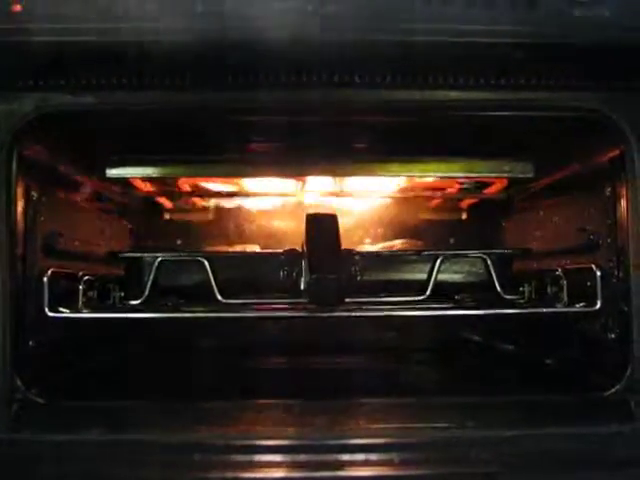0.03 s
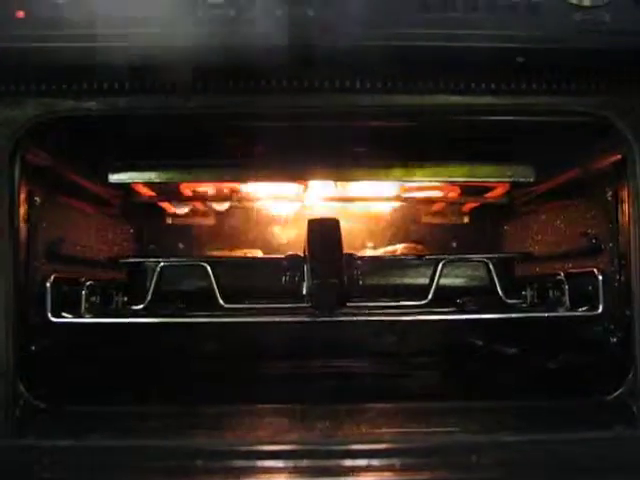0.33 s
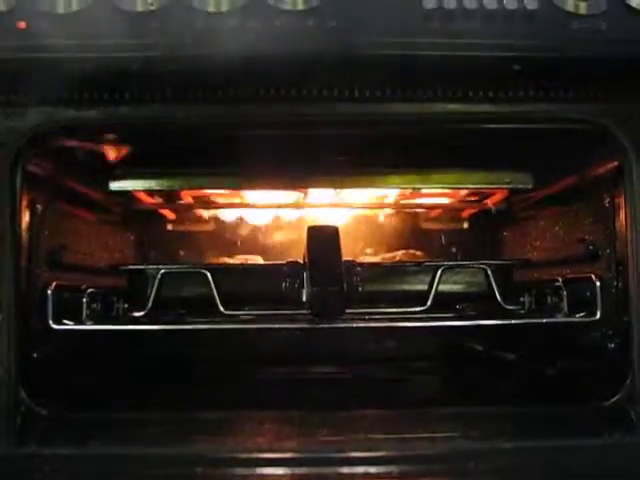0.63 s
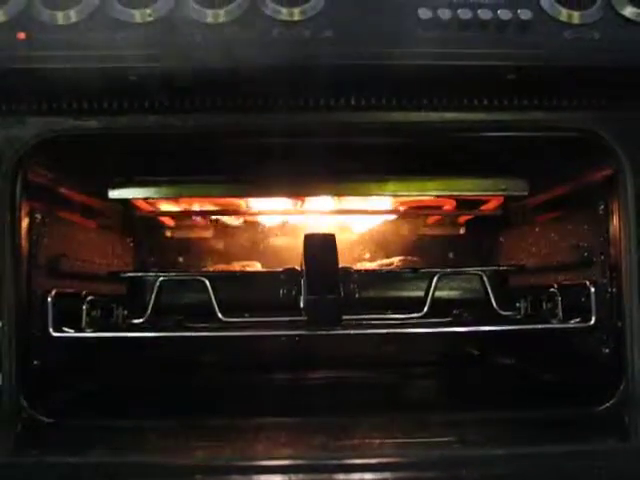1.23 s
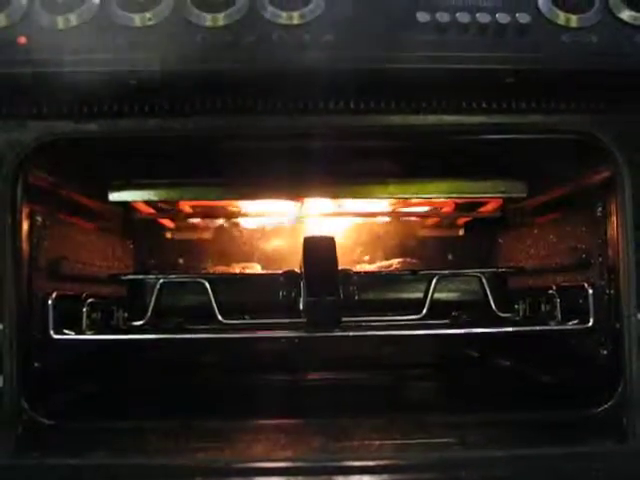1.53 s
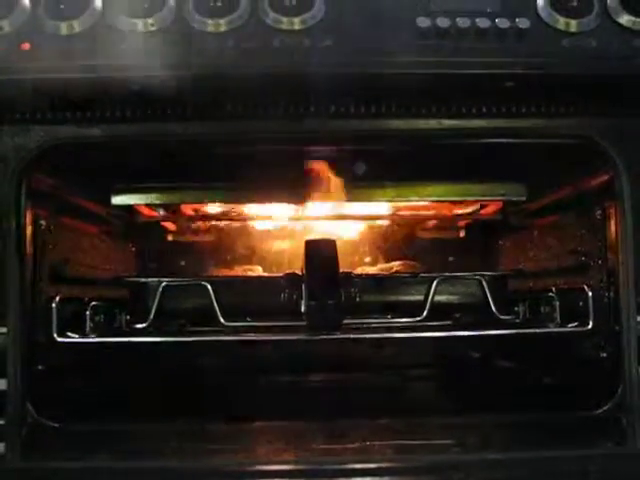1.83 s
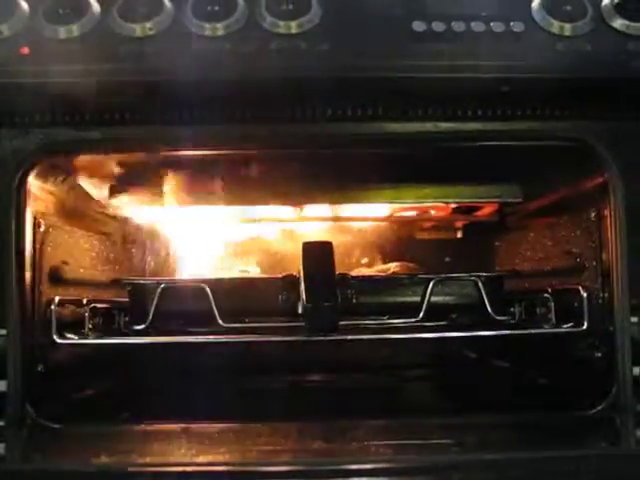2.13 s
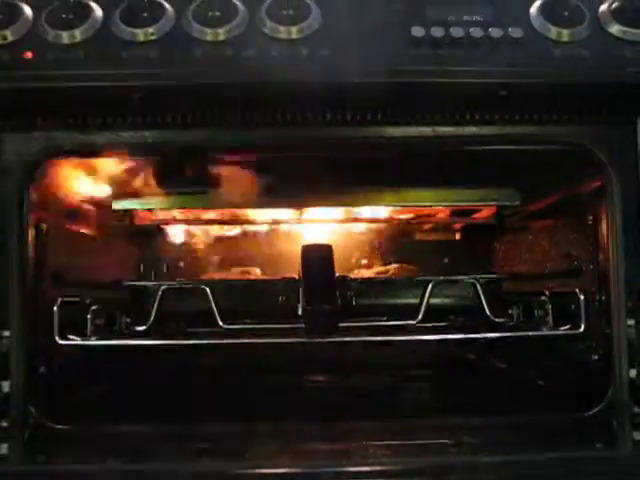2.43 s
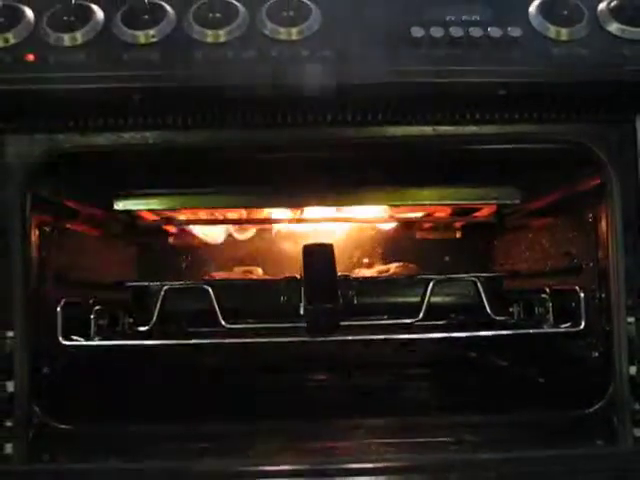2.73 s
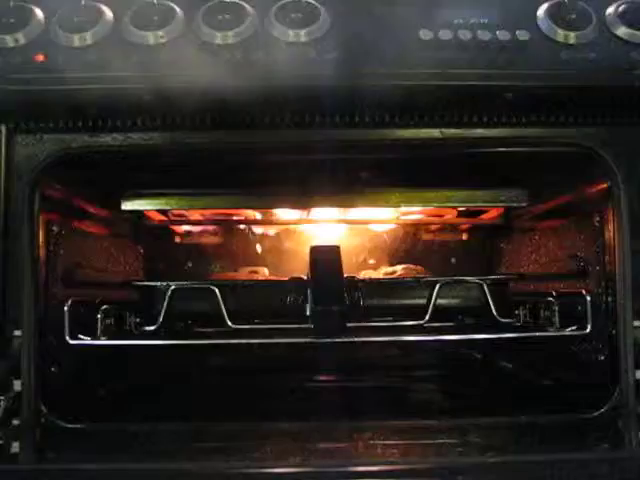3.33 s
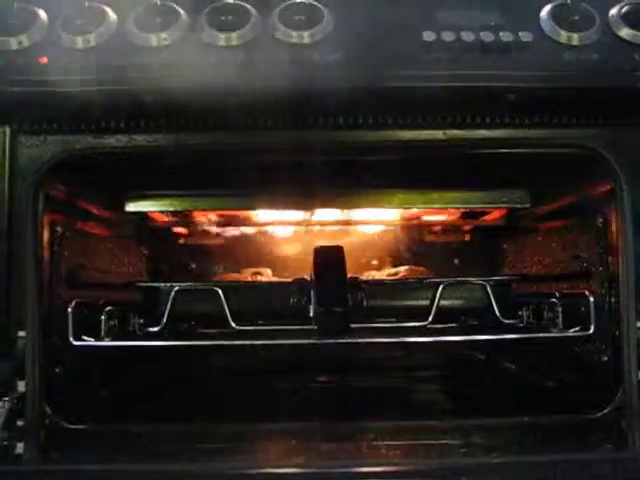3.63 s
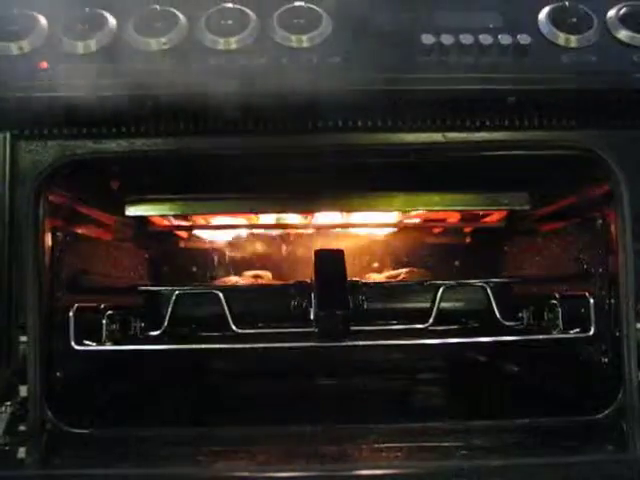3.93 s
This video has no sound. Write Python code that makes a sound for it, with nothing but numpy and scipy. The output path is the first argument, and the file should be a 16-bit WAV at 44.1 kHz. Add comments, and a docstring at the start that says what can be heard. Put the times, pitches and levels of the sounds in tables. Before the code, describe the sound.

Fat sizzles under an oven grill with a steady hiss and occasional sharp pops.

```python
"""A kitchen, with a stereo pair of microphones at the open oven door: food sizzles under a glowing grill.
Tiny bubbles of fat burst by the thousand over a hiss of steam and set the steel cavity ringing;
larger drops spit, pop and sputter. A low rumble and mains hum lie underneath.
The recorder adds a faint hiss, and its limiter ducks after the loudest pops."""
import sys
import numpy as np
from scipy import signal
from scipy.fft import rfft, irfft, next_fast_len
from scipy.io import wavfile
from scipy.ndimage import uniform_filter1d

SR = 44100
rng = np.random.default_rng(int(sys.argv[2]) if len(sys.argv) > 2 else 0)


def wav_record(signal):
    """Record a signal, one row per channel, as 16-bit PCM in the file named by sys.argv[1]."""
    frames = np.transpose(np.atleast_2d(signal))
    bounded = np.clip(frames, -1, 1)
    # unit amplitude maps onto the largest positive 16-bit level
    quanta = np.round(bounded * 32767).astype(np.int16)
    wavfile.write(sys.argv[1], SR, quanta)


N = 176400
T = np.arange(N) / SR
FFT_SIZE = next_fast_len(N + SR // 4)
HZ = np.maximum(np.arange(FFT_SIZE // 2 + 1) * SR / FFT_SIZE, 1)


def from_db(db):
    """Decibels to gain."""
    return 10 ** (np.asarray(db) / 20)


def unit_rms(x):
    """Scale to an RMS of 1."""
    return x / np.sqrt(np.mean(x ** 2) + 1e-20)


def gain_curve(points):
    """A (frequency [Hz], gain [dB]) table as a gain for every frequency."""
    hz, db = np.transpose(points)
    return from_db(np.interp(np.log(HZ), np.log(hz), db))


def colour(x, points):
    """Minimum-phase filter that follows a (frequency [Hz], gain [dB]) table."""
    cepstrum = irfft(np.log(gain_curve(points)), FFT_SIZE)
    cepstrum[1:FFT_SIZE // 2] *= 2
    cepstrum[FFT_SIZE // 2 + 1:] = 0
    return irfft(rfft(x, FFT_SIZE) * np.exp(rfft(cepstrum)), FFT_SIZE)[..., :N]


def noise(points):
    """Coloured (mid, side) noise with an RMS of 1."""
    return unit_rms(colour(rng.standard_normal((2, N)), points))


def drift(rate_hz):
    """Smooth random wander with an RMS near 1."""
    step, settle = 40, 2000
    pole = np.exp(-2 * np.pi * rate_hz * step / SR)
    white = rng.standard_normal(N // step + settle + 2)
    slow = signal.lfilter([1], [1, -2 * pole, pole * pole], white)[settle:]
    return np.interp(np.arange(N) / step, np.arange(len(slow)), unit_rms(slow))


def flutter(rate_hz):
    """Random wander with the slow swells taken out."""
    quick = drift(rate_hz)
    return unit_rms(quick - uniform_filter1d(quick, size=int(2 * SR / rate_hz)))


def swell(points, flutter_db, flutter_hz):
    """Gain that flutters around a (time [s], level [dB]) table."""
    return from_db(np.interp(T, *np.transpose(points)) + flutter_db * flutter(flutter_hz))


def burst(start, t60, hold=0):
    """Envelope that starts at once, holds and dies away; times in seconds."""
    envelope = np.zeros(N)
    span = slice(*np.searchsorted(T, [start, start + hold + 2 * t60]))
    envelope[span] = from_db(-60 * np.maximum(T[span] - start - hold, 0) / t60)
    return envelope


def ring(x, hz, t60):
    """A resonance: a unit click rings with a height of about 1."""
    radius, angle = from_db(-60 / (t60 * SR)), 2 * np.pi * hz / SR
    return signal.lfilter([.5, 0, -.5], [1, -2 * radius * np.cos(angle), radius ** 2], x + 1e-18)


def clicks(per_s, spread_db):
    """Randomly timed clicks, many small and few large."""
    sizes = from_db(spread_db * np.minimum(rng.exponential(1, N), 4)) * rng.choice([-1, 1], N)
    return sizes * (rng.random(N) < per_s / SR)


def oven_walls(x, t60=0.023, reflections_db=-1):
    """One spot in the oven as (mid, side): the direct sound and quick reflections off the walls."""
    t = T[:SR // 25]
    response = rng.standard_normal((2, len(t))) * from_db(-60 * t / t60)
    response /= np.linalg.norm(response, axis=1, keepdims=True)
    response[0] *= from_db(reflections_db)
    response[0, 0] += 1   # direct sound, mid only
    response[0] /= np.linalg.norm(response[0])
    return signal.oaconvolve(x[None], response, axes=1)[:, :N]


def bubbles(per_s, spread_db, cycles, span_hz, spots):
    """Bubbles burst at many spots, each with its own pitch, fading 60 dB in `cycles` periods."""
    bursts = clicks(per_s, spread_db)
    spot = rng.integers(0, spots, N)
    out = 0
    for k, hz in enumerate(np.geomspace(*span_hz, spots)):
        pings = ring(bursts * (spot == k), hz, cycles / hz)
        out += oven_walls(pings) * hz
    return unit_rms(out)


# Low rumble of the kitchen around the microphones: (frequency [Hz], gain [dB])
ROOM_RUMBLE = [(20, -2.5), (40, -22), (62, 2.5), (82, -11.5), (130, 5), (165, -3), (240, -0.5), (420, -6.5),
               (800, -5.5), (3000, -42.5)]
# The recorder's smooth hiss at the very top: (frequency [Hz], gain [dB])
RECORDER_HISS = [(4000, -46), (9000, 4), (12000, -1), (14500, 3), (16000, -4)]
# Mains hum, centred: (frequency [Hz], level [dB])
MAINS_HUM = [(100, -54), (200, -55)]

def background(rumble_db=-43, hiss_db=-47.5):
    """Low room rumble and mains hum, with the recorder's faint high hiss."""
    out = from_db(rumble_db) * noise(ROOM_RUMBLE) + from_db(hiss_db) * noise(RECORDER_HISS)
    for hz, db in MAINS_HUM:
        out[0] += from_db(db) * np.sqrt(2) * np.sin(2 * np.pi * (hz * T + rng.random()))
    return out


# Cavity and pan, heard through the open door: (frequency [Hz], relative level [dB], t60 [s])
STEEL_MODES = [(571, -16.5, 0.27), (706, -19.5, 0.17), (876, -10, 0.075), (1144, -12.5, 0.27),
               (1607, -7, 0.14), (1903, -5.5, 0.03), (2000, -5.5, 0.061), (2466, -1.5, 0.093),
               (2686, 0.5, 0.042), (3007, -1.5, 0.18), (3576, 3, 0.013)]

def oven_ring(frying, ring_db=-22.5, waver_db=2.0):
    """The cavity and pan ring along with the frying, each mode swelling by itself."""
    modes = 0
    for hz, db, t60 in STEEL_MODES:
        drive = frying * from_db(waver_db * drift(rate_hz=3.8))
        modes += from_db(db) * unit_rms(ring(drive, hz, t60))
    return from_db(ring_db) * np.std(frying) * modes


# Fat bubbling down in the pan: (time [s], level [dB])
POOL_LEVEL = [(0, -34), (.3, -34.5), (.55, -34), (.78, -37), (1.15, -35.5), (1.25, -34), (1.47, -39.5),
              (1.58, -31), (1.69, -32), (1.735, -36), (1.78, -31), (1.95, -36), (2.03, -34), (2.13, -32),
              (2.3, -37), (2.48, -34.5), (2.8, -37), (2.92, -35), (3.16, -34.5), (3.2, -32), (3.33, -35),
              (3.45, -37), (3.67, -36), (4, -38)]

def bubbling(band_hz=(1700, 3900)):
    """Loose, longer-ringing bubbles in the pooled fat."""
    grains = bubbles(per_s=1500, spread_db=2.5, cycles=19, span_hz=(2007, 3290), spots=12)
    band = signal.butter(2, band_hz, "band", fs=SR, output="sos")
    return unit_rms(signal.sosfilt(band, grains)) * swell(POOL_LEVEL, flutter_db=1.0, flutter_hz=20)


# The crackle swells as the fat flares: (time [s], level [dB])
FLARE_LEVEL = [(0, -30.5), (.4, -36.5), (.58, -32.5), (.74, -36), (.88, -32), (1.05, -35.5), (1.5, -35),
               (1.64, -32.5), (1.74, -32), (1.88, -32.5), (1.96, -33.5), (2.1, -30.5), (2.25, -31.5),
               (2.44, -31), (2.5, -35.5), (2.95, -37), (3.2, -34), (3.5, -36.5), (3.66, -36), (3.75, -32.5),
               (3.85, -36), (4, -35)]
# Tone of the crackle at the door: (frequency [Hz], gain [dB])
CRACKLE_TONE = [(150, -17), (300, -1.5), (450, 1), (600, 4.5), (1000, 1.5), (1450, 5), (1900, 3),
                (2700, -3.5), (3500, -5.5), (6000, -5), (16000, -28)]

def crackle(bursts_db=-6.5, rush_db=-7):
    """Larger, lower bubbles and the rush of burning fat."""
    grains = bubbles(per_s=2000, spread_db=3, cycles=10, span_hz=(910, 4400), spots=14)
    bursts = from_db(bursts_db) * unit_rms(colour(grains, CRACKLE_TONE))
    rush = from_db(rush_db) * noise(CRACKLE_TONE)
    return (bursts + rush) * swell(FLARE_LEVEL, flutter_db=0.77, flutter_hz=17.6)


# Wet sputters inside the oven: (time [s], length [s], level [dB], pitch [Hz], t60 [s])
STEAM_POCKETS = [(0.203, 0.028, -31, 1750, 0.0074), (0.238, 0.015, -22, 2900, 0.0031),
                 (0.816, 0.037, -26.5, 2260, 0.0036), (0.818, 0.024, -26.5, 1070, 0.0092),
                 (1.707, 0.015, -30, 1900, 0.0044), (2.115, 0.025, -33, 2800, .004),
                 (2.225, 0.032, -30.5, 2760, .0025), (2.337, 0.025, -29, 1840, 0.0076),
                 (2.369, 0.009, -23, 2400, .002), (2.379, 0.021, -29.5, 2000, 0.0047),
                 (2.538, .015, -25.5, 3000, 0.0057), (2.669, .018, -28, 3080, .003),
                 (2.808, 0.005, -27, 2000, .004), (3.008, 0.031, -35, 1750, 0.007),
                 (3.147, 0.02, -34.5, 1940, 0.006), (3.321, .028, -32.5, 2600, .005)]

def sputters(edge_s=0.0016):
    """Steam forces through wet fat: a brief run of clicks into one pocket resonance."""
    run = oven_walls(clicks(per_s=1800, spread_db=2.5))
    out = 0
    for start, length, db, hz, t60 in STEAM_POCKETS:
        inside_s = np.minimum(T - start, start + length - T)
        gate = np.clip(inside_s / edge_s + .5, 0, 1)
        gate_rms = np.sqrt(np.mean(gate ** 2))
        out += from_db(db) * gate_rms * unit_rms(gate * ring(run, hz, t60))
    return out


# The oven's dull knock under a pop: (frequency [Hz], gain [dB])
KNOCK_TONE = [(60, -9), (200, -5), (600, 0.5), (1000, 4.5), (1800, 7.5), (3300, 5), (4500, -5),
              (16000, -55)]
# Large drops, heard from the door:
# (time [s], level [dB], pitch [Hz], relative knock [dB], relative ping [dB], spray resonance t60 [s])
LARGE_DROPS = [(0.24, -8.5, 5640, -8, -2, 0.0015), (0.946, -21.5, 4460, -9, -10, .001),
               (1.2235, -10.5, 7300, -15, -10, 0.0012), (1.708, -17, 4900, -13, -10, .0008),
               (1.9058, -7, 5270, -10, -2, .0017), (3.4595, -18, 5540, -25, -7, .0012)]

def pops(spray_pitch_ratio=1.1):
    """A drop explodes: a band of spray, a ringing ping just below it and a dull knock in the oven."""
    out = np.zeros((2, N))
    white = rng.standard_normal((2, N))
    knock = noise(KNOCK_TONE)
    for start, db, hz, knock_db, ping_db, spray_t60 in LARGE_DROPS:
        blast = from_db(db) * burst(start, t60=0.026, hold=0.001)
        spray_hz = spray_pitch_ratio * hz
        spray = unit_rms(ring(ring(white, spray_hz, spray_t60), spray_hz, spray_t60))
        out += blast * (spray + from_db(knock_db) * knock)
        ping = burst(start, t60=0.057) * np.sin(2 * np.pi * hz * (T - start))
        out[0] += from_db(db + ping_db) * ping
    return out


# Small drops, sharp at the microphones: (time [s], ping level [dB], pitch [Hz], spray level [dB])
SMALL_DROPS = [(0.135, -7, 7110, -15), (0.1968, 2, 7500, -17), (0.2895, -6.5, 5200, -29),
               (0.398, -3, 8000, -15), (0.4265, -15, 6830, -13), (0.6768, -6, 7060, -20),
               (0.722, -17, 7350, -29), (0.9163, -11, 7530, -20), (0.9726, -4, 6900, -12.5),
               (1.0292, -6, 7750, -26), (1.1082, -7, 8170, -19), (1.3948, -5, 7300, -18),
               (1.4716, -21, 7820, -28), (1.7085, -12, 5770, -20), (1.7474, -10, 7080, -18),
               (1.794, -10, 7240, -32), (2.331, -14, 7520, -20), (2.383, -7, 7500, -19),
               (2.4573, -6, 8150, -20), (2.5327, -8, 7600, -21), (2.809, -6, 7810, -17),
               (2.828, -8, 7540, -14), (2.9134, -10, 7100, -17), (3.1609, -6, 7900, -29),
               (3.292, -9, 7620, -20), (3.363, -11, 7700, -24), (3.4631, -10, 6800, -30),
               (3.541, -6, 7600, -24), (3.625, -9, 7570, -18), (3.797, -7, 7640, -26)]

def spits(ping_t60=0.0034, spray_t60=0.029, top_hz=10000):
    """Each spit of fat is a very short ping and a puff of spray with the tone of the sizzle."""
    pings, puffs = np.zeros(N), np.zeros(N)
    for start, db, hz, spray_db in SMALL_DROPS:
        pings += from_db(db) * burst(start, ping_t60) * np.sin(2 * np.pi * hz * (T - start))
        puffs += from_db(spray_db) * burst(start, spray_t60)
    out = puffs * noise(SIZZLE_TONE)
    soften = signal.butter(4, top_hz, fs=SR, output="sos")   # wet fat softens the snap
    out[0] += signal.sosfilt(soften, pings)
    return out


# Vigour of the sizzle under the grill: (time [s], level [dB])
SIZZLE_LEVEL = [(0, -17.5), (.17, -21), (.28, -21.5), (.37, -20.5), (.55, -20.5), (.78, -21.5), (.9, -21),
                (1.15, -23), (1.4, -21), (1.5, -23), (1.6, -20), (1.67, -21.5), (1.7, -19.5), (1.73, -22.5),
                (1.88, -22), (1.94, -21.5), (2.12, -18.7), (2.22, -21), (2.37, -21), (2.42, -23.5),
                (2.56, -21.5), (2.64, -22.5), (2.77, -20), (2.86, -22.5), (3.02, -23), (3.26, -20.5),
                (3.41, -23.5), (3.53, -21), (3.63, -22.5), (3.73, -20), (3.9, -22.5), (4, -21.5)]
# Its bright tone at close range: (frequency [Hz], gain [dB])
SIZZLE_TONE = [(900, -37), (1700, -21), (2600, -14), (3300, -15), (3650, -13.5), (4100, -13), (4700, -11),
               (5300, -6.5), (6400, -4.5), (7400, 0.5), (8100, -2.5), (8800, -6), (9500, -6.5),
               (10500, -11.5), (12200, -18), (14800, -20), (16000, -35)]

def sizzle(fizz_db=-1.32, steam_db=-3.5, clump_db=0.95):
    """Fine bubbles of fat burst in quick clumps over a smooth hiss of steam."""
    per_s = 4800 * from_db(clump_db * flutter(rate_hz=65))
    grains = bubbles(per_s, spread_db=4, cycles=6.8, span_hz=(2860, 9700), spots=28)
    fizz = from_db(fizz_db) * unit_rms(colour(grains, SIZZLE_TONE))
    steam = from_db(steam_db) * noise(SIZZLE_TONE)
    return (fizz + steam) * swell(SIZZLE_LEVEL, flutter_db=0.77, flutter_hz=34)


# Stereo width at the door: (frequency [Hz], side gain [dB])
PAIR_WIDTH = [(100, -41), (350, -19.5), (1450, -16.5), (1950, -24), (2250, -14), (3000, -7), (3900, -4.5),
              (4500, 2), (5100, -6.5), (6200, -8), (7300, -7.5), (9500, -3.5), (13000, -1.5)]
# Balance of the microphones: (frequency [Hz], left minus right [dB])
PAIR_BALANCE = [(100, 0.3), (700, -0.5), (2000, -0.1), (2300, -0.5), (2550, -5), (3500, -3.5), (4000, 2),
                (4550, 2.5), (5100, 2.5), (5700, -4.5), (6300, 0.5), (8800, -1.6), (13000, -0.2)]
# Phase between the microphones: (frequency [Hz], lead of the left [rad])
PAIR_PHASE = [(2900, -0.0091), (3600, 0.96), (4300, 0.37), (4850, -0.007), (6300, 1.27), (8000, -0.39),
              (9700, 0.97), (12000, 0.17)]

def microphones(x):
    """Mid and side to left and right: narrow in the bass, wide and uneven in the treble."""
    mid, side = rfft(x, FFT_SIZE)
    side = side * gain_curve(PAIR_WIDTH)
    lead = np.interp(HZ, *np.transpose(PAIR_PHASE))
    lean = np.sqrt(gain_curve(PAIR_BALANCE)) * np.exp(.5j * lead)
    left, right = (mid + side) * lean, (mid - side) / lean
    return irfft(np.array([left, right]), FFT_SIZE)[:, :N]


def scene():
    """From the oven door: steady frying in the ringing cavity, single drops and a quiet background."""
    frying = sizzle() + crackle() + bubbling()
    return microphones(frying + oven_ring(frying) + spits() + pops() + sputters() + background())


def record(dry, limit_db=-8.5, release_db_per_s=83, attack_s=0.0022, ceiling=0.95, top_hz=16200):
    """The recorder's limiter ducks after loud pops, peaks are rounded and the top is cut."""
    power = uniform_filter1d(np.mean(dry ** 2, axis=0), size=90)
    over_db = np.maximum(10 * np.log10(np.maximum(power, 1e-12)) - limit_db, 0)
    release_db = release_db_per_s * T
    held_db = np.maximum.accumulate(over_db + release_db) - release_db
    pole = np.exp(-1 / (attack_s * SR))
    duck_db = signal.lfilter([1 - pole], [1, -pole], held_db)
    limited = dry * from_db(-duck_db)
    rounded = limited / (1 + (limited / ceiling) ** 6) ** (1 / 6)
    return signal.sosfilt(signal.cheby2(16, 70, top_hz, fs=SR, output="sos"), rounded)


dry = scene()
out = record(dry)
wav_record(out)
```